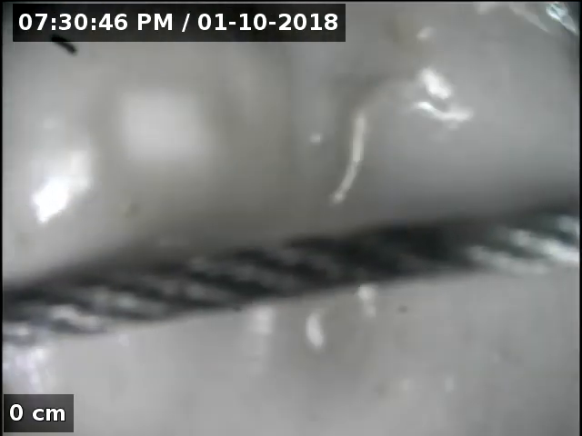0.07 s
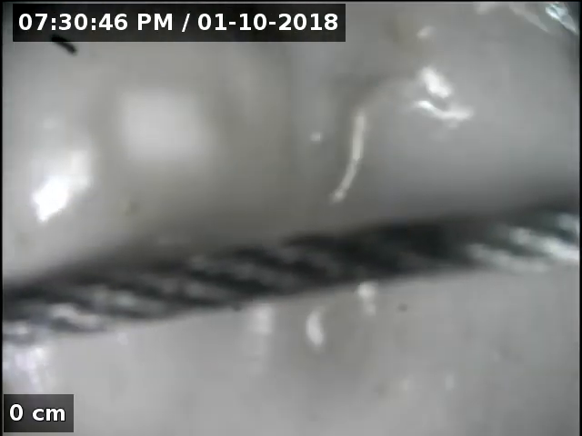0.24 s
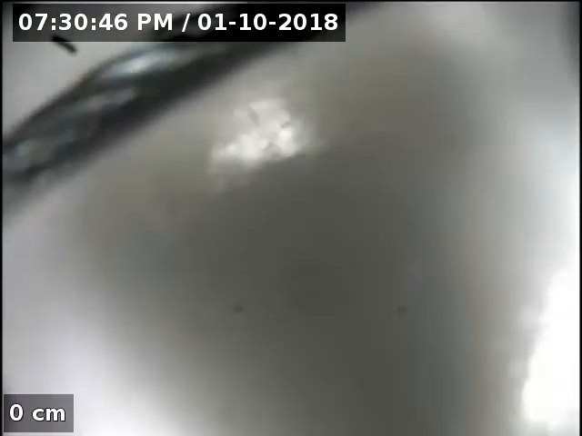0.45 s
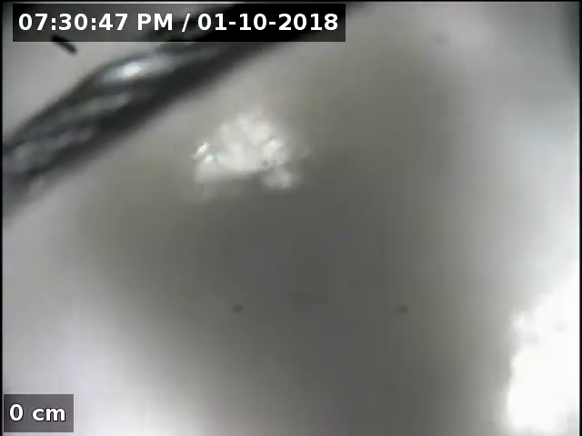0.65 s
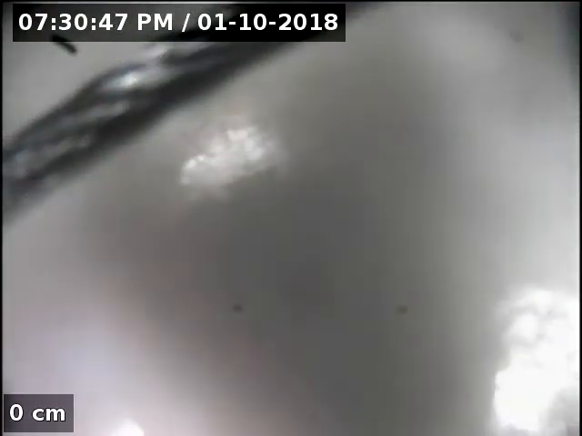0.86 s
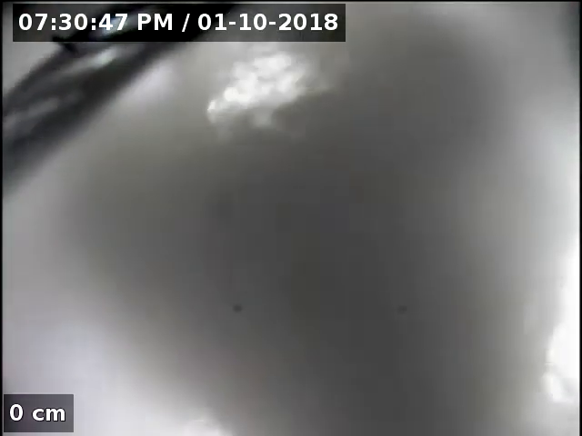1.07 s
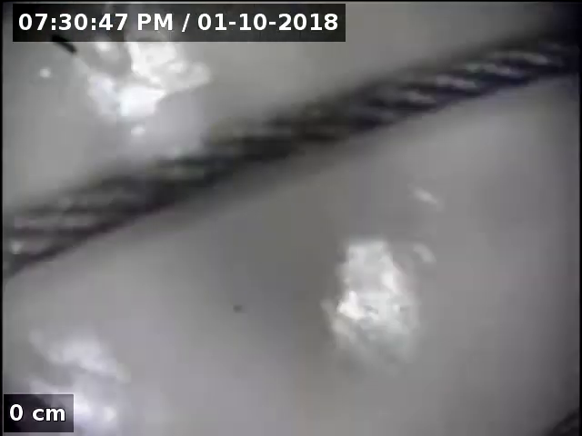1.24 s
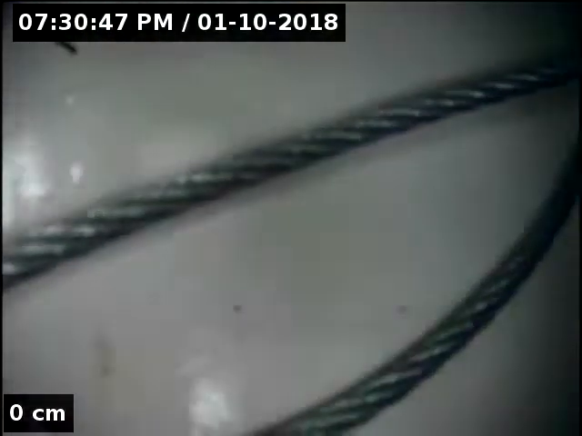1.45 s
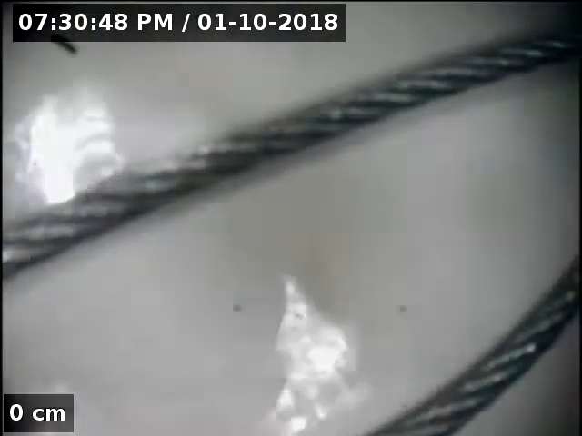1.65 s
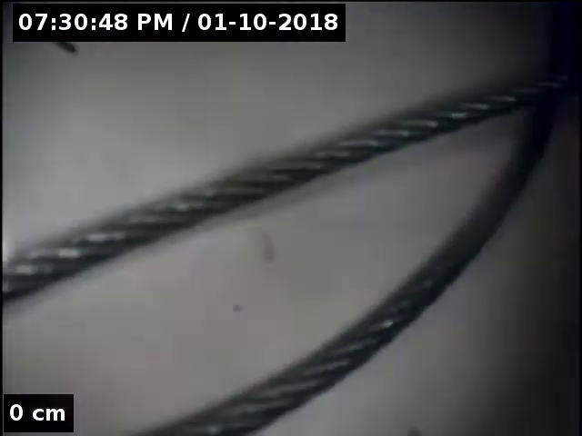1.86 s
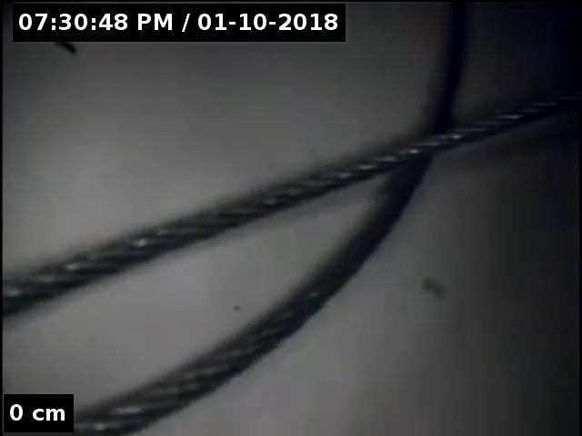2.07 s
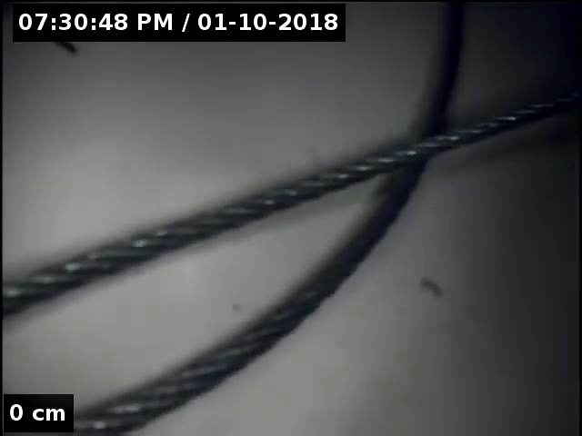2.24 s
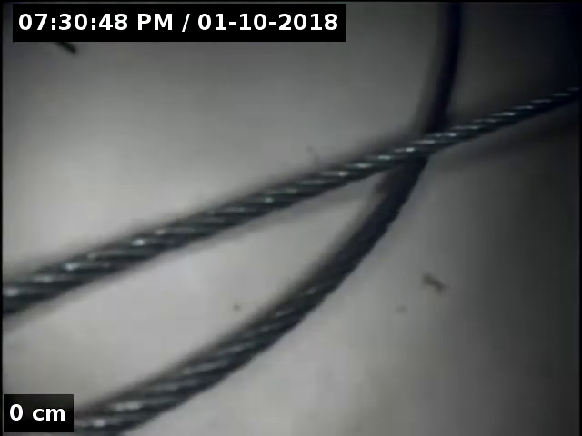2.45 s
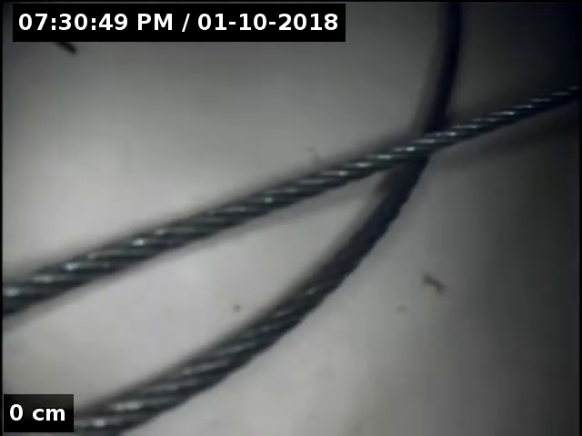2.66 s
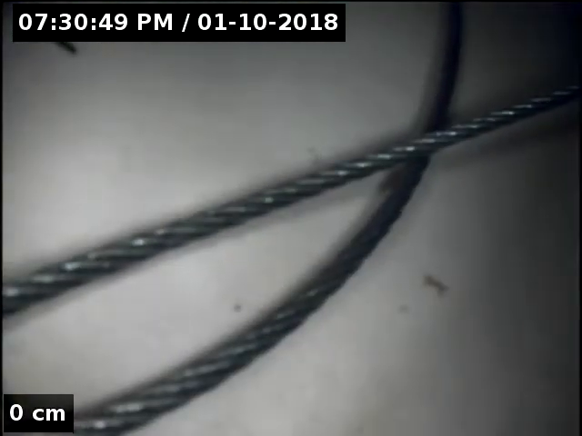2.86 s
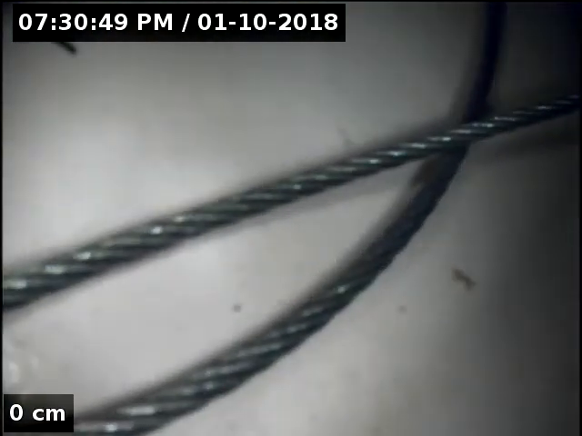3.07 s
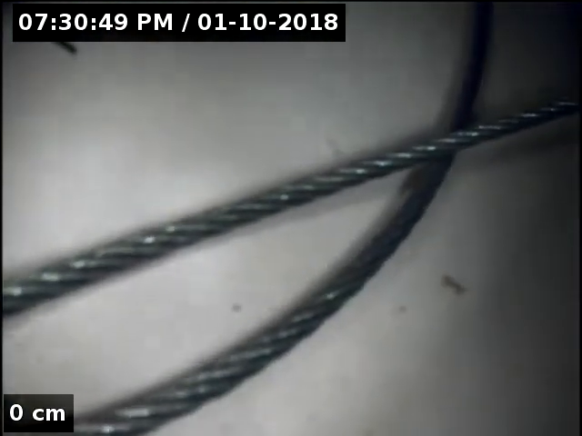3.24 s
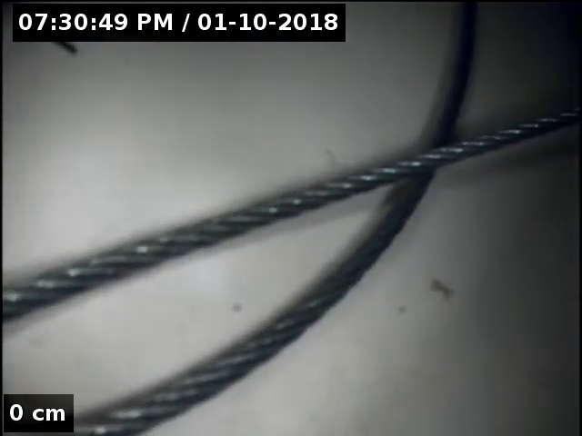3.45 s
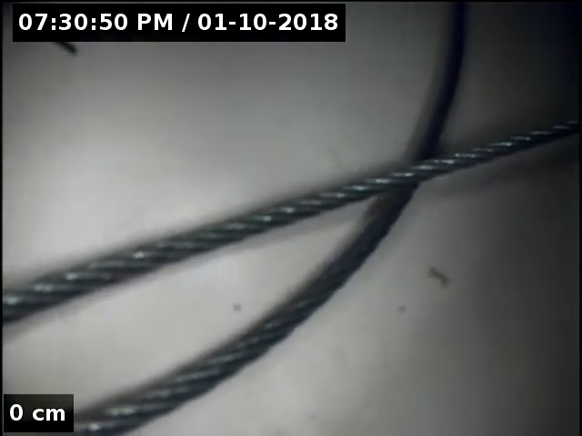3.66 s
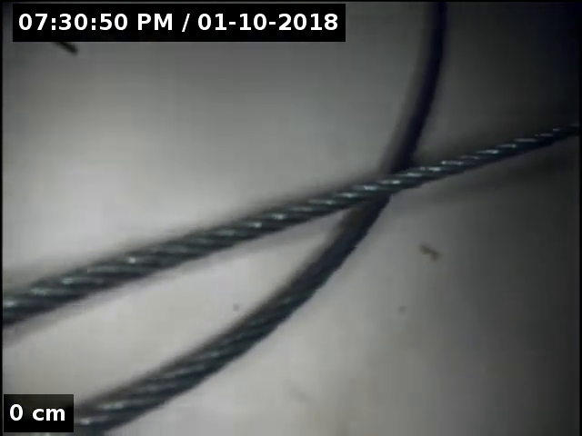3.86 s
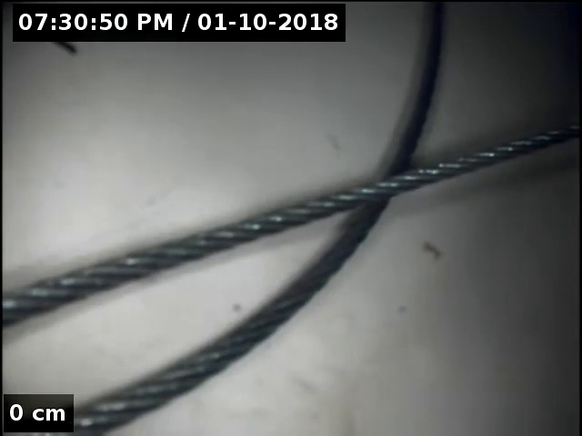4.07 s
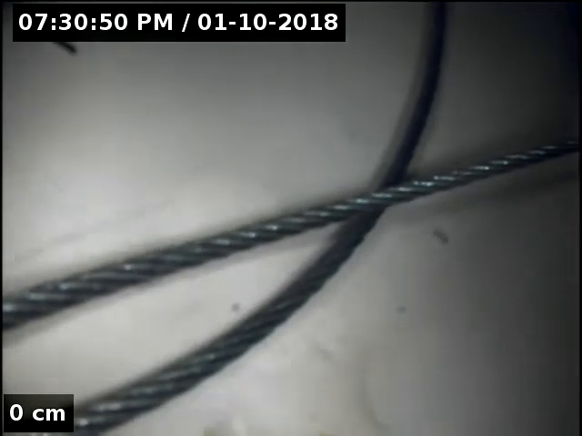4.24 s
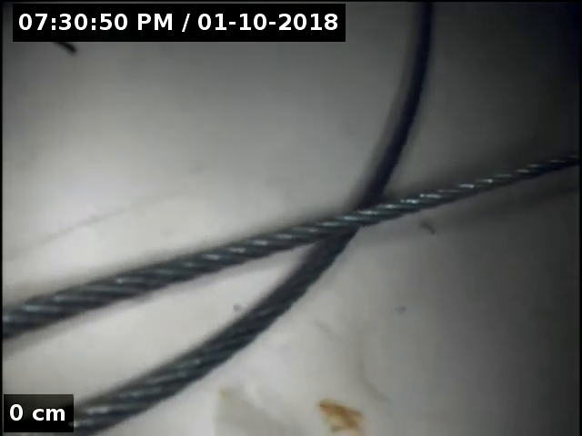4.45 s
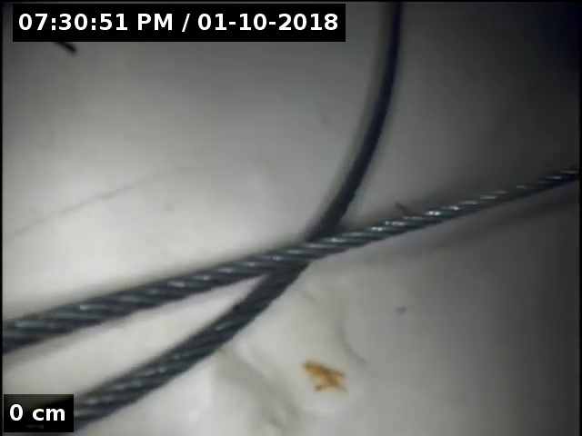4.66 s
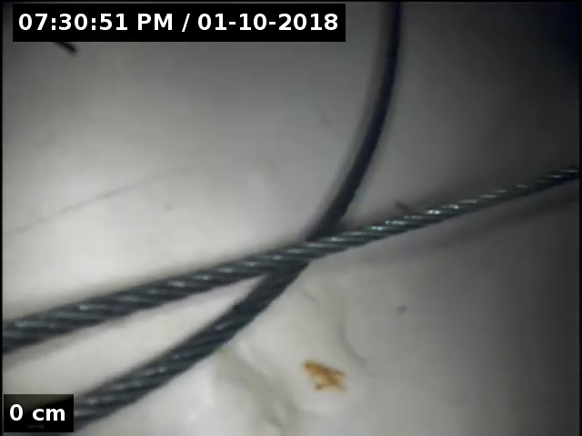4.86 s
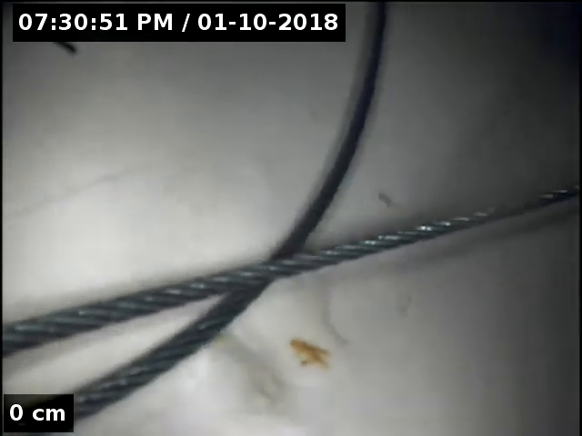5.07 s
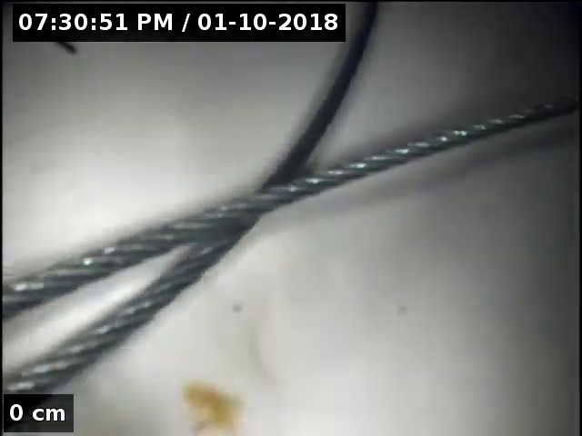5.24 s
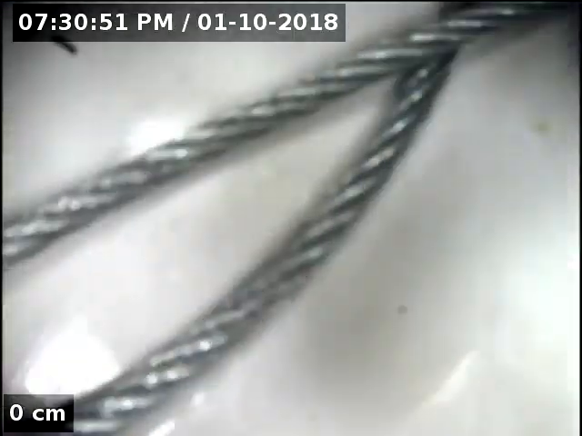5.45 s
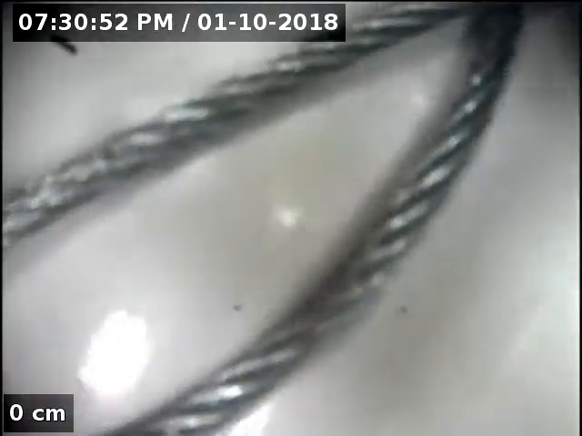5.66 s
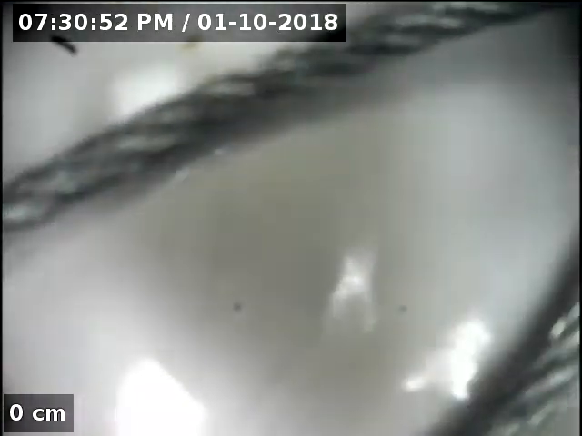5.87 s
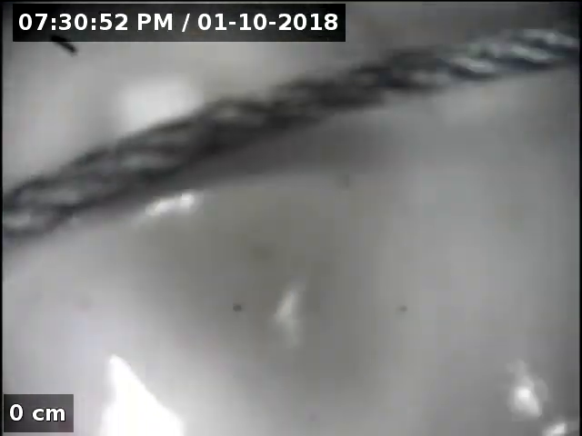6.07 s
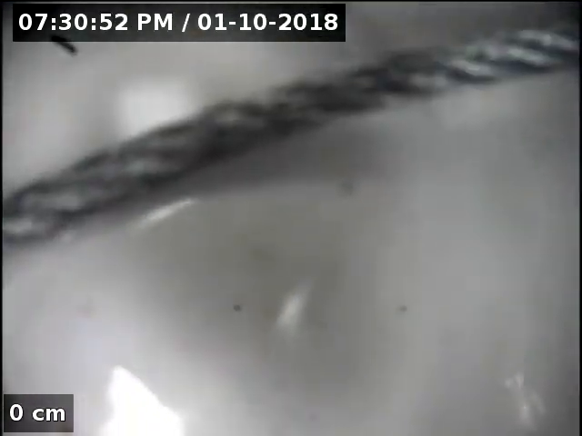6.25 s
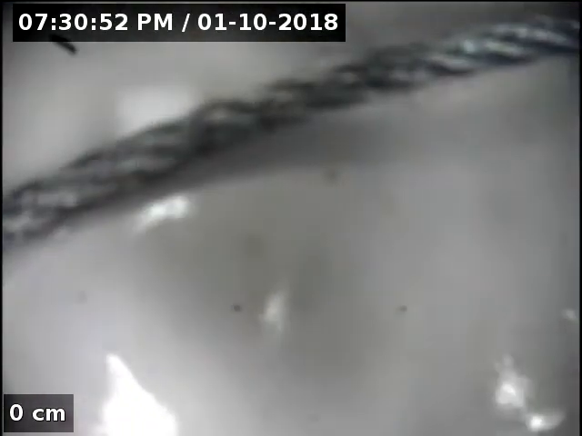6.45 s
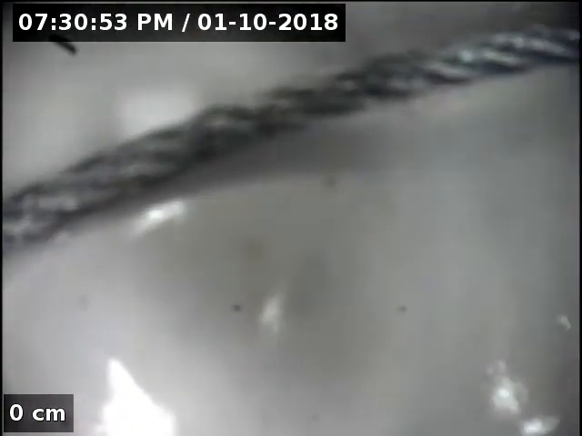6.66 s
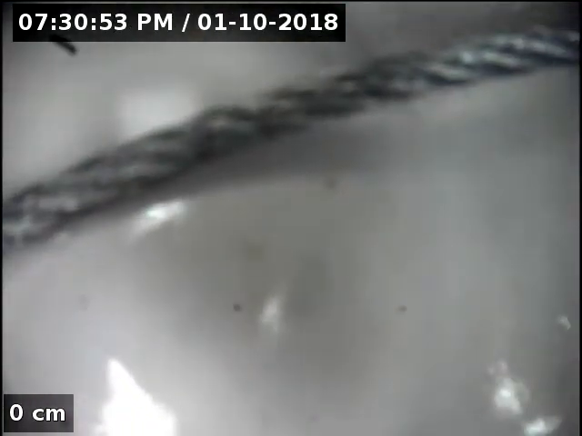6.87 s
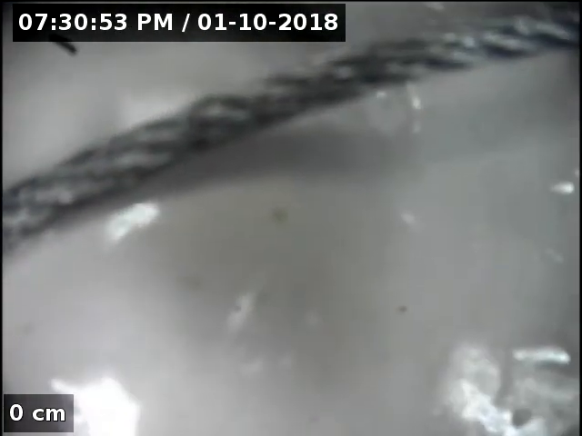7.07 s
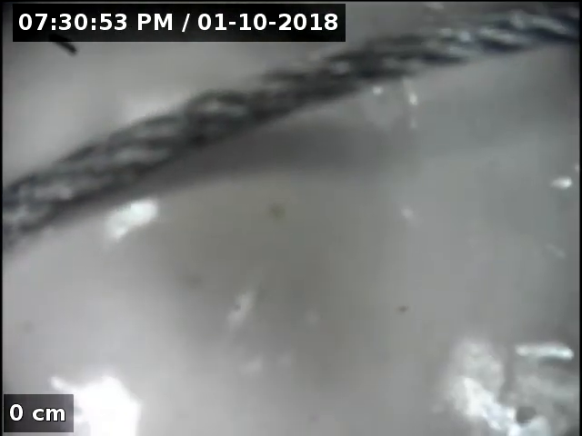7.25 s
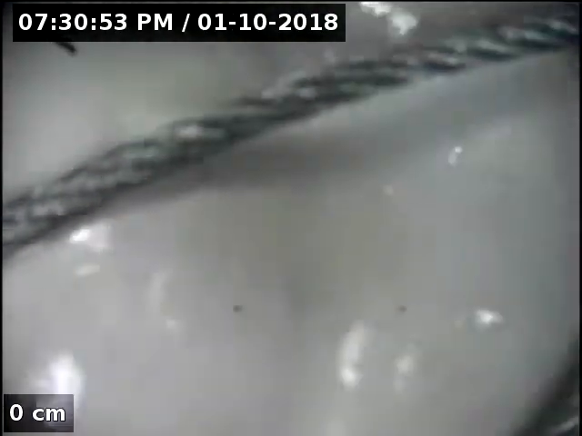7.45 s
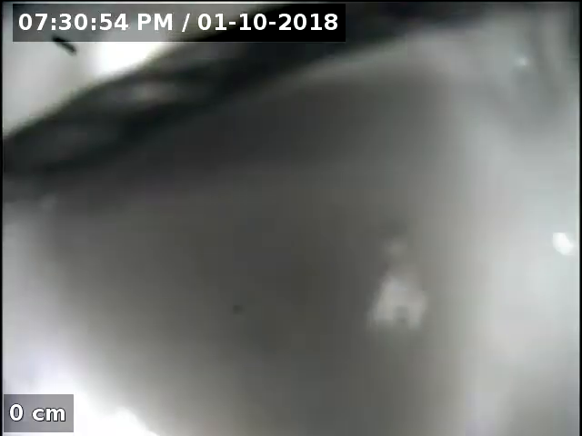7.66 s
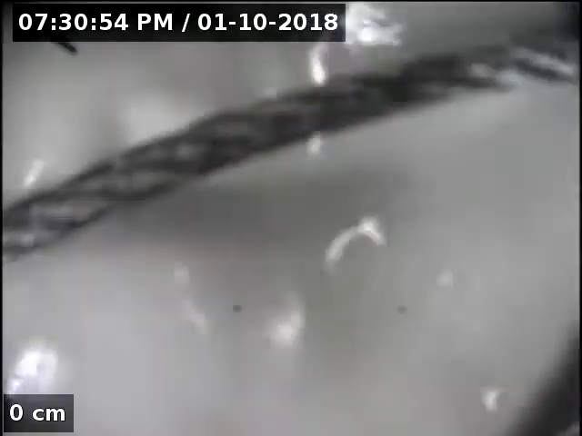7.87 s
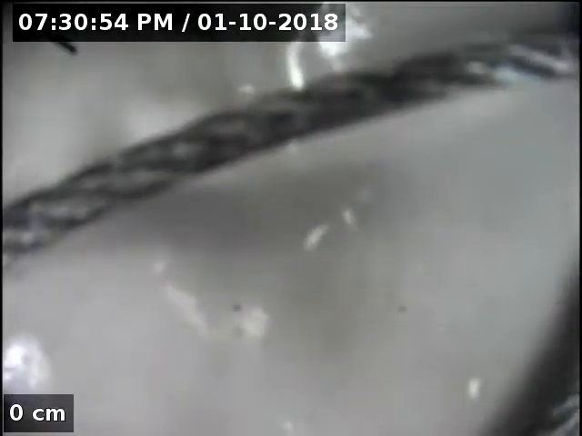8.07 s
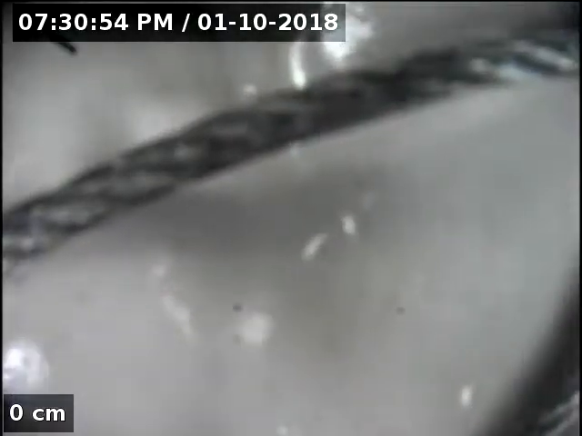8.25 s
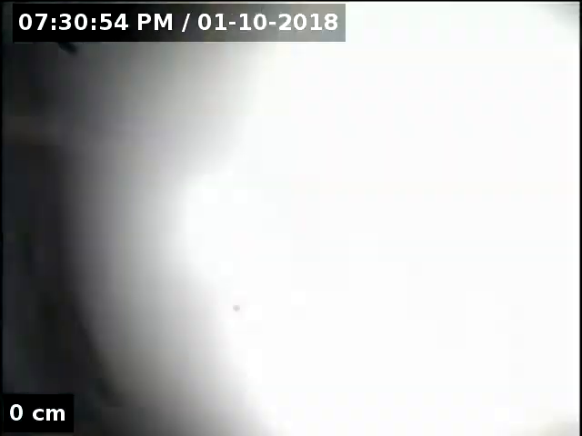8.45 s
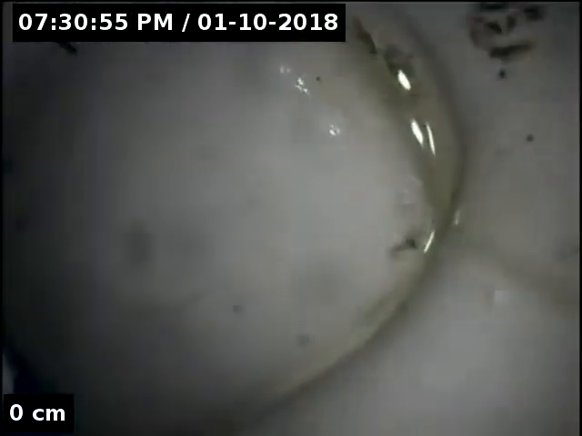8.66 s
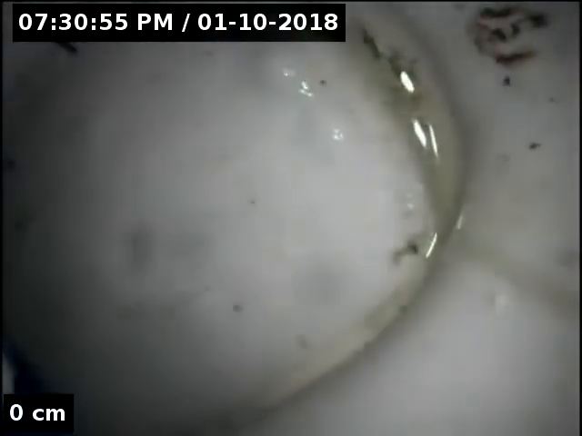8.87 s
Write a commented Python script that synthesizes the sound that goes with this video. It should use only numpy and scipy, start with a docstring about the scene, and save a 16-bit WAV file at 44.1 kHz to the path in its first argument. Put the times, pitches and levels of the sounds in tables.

```python
"""Steel cable in a porcelain bowl

A steel cable with a small metal head is worked back and forth inside a porcelain bowl. It ticks, knocks
and chatters: bursts of force ring the bowl's modes, and a small hard room answers with a decaying tail.
Random catch-and-slip pulses make the sliding, shaped noise the steady hiss, and a faint hum swells twice.
The narrow-band microphone thumps on loud knocks and cuts out once."""
import sys
import numpy as np
from scipy import signal
from scipy.fft import rfft, irfft
from scipy.io import wavfile
from scipy.ndimage import uniform_filter1d

SR = 44100
rng = np.random.default_rng(int(sys.argv[2]) if len(sys.argv) > 2 else 0)


def master_out(mix):
    """Clip the mix to full scale and print it as 16-bit PCM to the path in sys.argv[1]."""
    frames = np.transpose(np.atleast_2d(mix))
    ceiling = np.clip(frames, -1, 1)
    pcm = np.round(ceiling * 32767).astype(np.int16)
    wavfile.write(sys.argv[1], SR, pcm)


N = 392931
TIME = np.arange(N) / SR

# The cable or its head meets the porcelain. Each row: start in seconds, level in dB before the register
# levels, hardness in octaves above a dull thud, tick in dB relative to the level,
# chatter decay time in seconds (the bounces cap it).
CONTACTS = [(0.002, -19.5, 1.24, -20.5, 0.0027), (0.03, -30.5, 1.12, -29, 0.021),
            (0.069, -38.0, 1.16, -36, 0.0079), (0.157, -37, 0.86, -47, 0.012),
            (0.231, -47.5, 2.5, -20, 0.0052), (0.451, -41, 1.7, -29, 0.038),
            (0.502, -44, 2.8, -14.5, 0.0052), (0.571, -31, 1.14, -53, 0.0017),
            (0.608, -36.5, 1.36, -44, 0.0027), (0.702, -44, 3.06, -20, 0.001),
            (0.925, -35, 2.54, -17.5, 0.019), (1.084, -50, 2.96, -22, 0.0022),
            (1.196, -40.5, 1.74, -31, 0.025), (1.233, -52.5, 3.3, 0.5, 0.04),
            (1.293, -22, 3.92, -14, 0.0019), (1.548, -45.5, 2.37, -27, 0.0087),
            (1.616, -37, 2.48, -25.5, 0.01), (1.749, -43, 2.9, -20, 0.0015), (1.8, -47, 1.9, -30, 0.0056),
            (1.891, -43.5, 2.2, -30, 0.0014), (1.967, -37.5, 2.96, -24, 0.003),
            (2.238, -43.5, 0.25, -37, 0.016), (2.273, -41.5, 0.9, -44, 0.023),
            (2.385, -47.5, 0.69, -31, 0.011), (2.493, -48, 0.2, -32, 0.03),
            (2.533, -51.5, 2.86, -25, 0.0035), (2.637, -52.5, 2.65, -35, 0.0032),
            (3.06, -48.5, 2.8, -38, 0.002), (3.602, -58.5, 2.55, -6.5, 0.0015),
            (3.707, -48.5, 2, -37, 0.0022), (3.865, -54, 2.85, -27, 0.003), (4.388, -55.5, 2.6, -22, 0.003),
            (4.541, -49.5, 2.6, -10.5, 0.0024), (4.892, -52, 0.12, -38.5, 0.0025),
            (5.017, -55, 3.2, 2, 0.0028), (5.094, -46, 2.5, -31, 0.011), (5.112, -47.5, 3.3, -13, 0.011),
            (5.191, -38.5, 2.3, -22.5, 0.007), (5.364, -40, 2.06, -10, 0.0016),
            (5.396, -26.5, 2.62, -16, 0.0016), (5.415, -28.0, 2.53, -14, 0.016),
            (5.435, -32.5, 2.9, -14, 0.017), (5.475, -36, 2.7, -1, 0.0091), (5.513, -28, 1.1, -33, 0.014),
            (5.611, -47.5, 1.7, -37, 0.025), (5.675, -45.5, 0.9, -30, 0.041),
            (5.745, -41.5, 1.5, -39, 0.0089), (5.801, -44.5, 2.46, -19, 0.015),
            (5.82, -31.5, 1.29, -39, 0.0065), (5.912, -36, 0.97, -42, 0.0036),
            (5.959, -47.5, 3, -14, 0.003), (5.977, -46.5, 1.5, -33, 0.002), (6.031, -33.5, 2, -13, 0.0036),
            (6.045, -28.5, 2.2, -11.5, 0.027), (6.063, -25, 0.91, -17.5, 0.021),
            (6.081, -28, 2.03, -21, 0.0018), (6.115, -39, 2.3, -1.5, 0.011),
            (6.382, -41.5, 2.24, -24, 0.0015), (6.575, -40.0, 3.44, -18.5, 0.0048),
            (6.88, -42.0, 3.05, -25, 0.0022), (6.998, -34.5, 3.87, -22, 0.0017),
            (7.061, -42, 3.03, -21, 0.002), (7.344, -37.5, 2.96, -17.5, 0.006),
            (7.364, -42, 2.5, -7.5, 0.0035), (7.423, -34.5, 4, -18, 0.0016), (7.476, -36, 2.7, -23, 0.0075),
            (7.485, -27, 3.1, -15, 0.0013), (7.562, -34, 2.03, -20, 0.022), (7.589, -23, 2.98, -8, 0.0057),
            (7.812, -37, 1.68, -25, 0.027), (7.83, -34.5, 0.82, -27, 0.019),
            (7.849, -42.5, 2.44, -6.5, 0.017), (7.889, -34.5, 4, -17, 0.002),
            (7.947, -38, 2.1, -22, 0.0046), (7.959, -28.5, 3.9, -13.5, 0.004),
            (8.169, -39.5, 2.73, -18.5, 0.019), (8.206, -42, 2.95, -7, 0.0037),
            (8.321, -29.5, 3.8, -22, 0.002), (8.328, -22.5, 3.68, -13.5, 0.00091),
            (8.353, -25.5, 3.1, -10.5, 0.0048), (8.383, -23.5, 3.08, -14.5, 0.0079),
            (8.421, -21, 2.6, -16.5, 0.014), (8.475, -33.5, 6, -10.5, 0.014),
            (8.492, -34.5, 2.94, -5, 0.034), (8.513, -27, 3.53, -11.5, 0.02),
            (8.534, -15.5, 2.7, -6, 0.012), (8.566, -27, 4.8, -16, 0.002),
            (8.578, -14.5, 2.48, -10, 0.0049), (8.605, -19, 2.86, -14.5, 0.0012),
            (8.627, -18.5, 2.93, -5.5, 0.012), (8.677, -27, 2.8, -12.5, 0.0044)]
# Pitch ranges of a contact, from thud to tick. Each row: low edge in Hz, high edge in Hz, gain in dB.
REGISTERS = [(195.6, 676, 0.5), (765, 1293, 0), (1497, 2033, 2), (2240, 3145, 2), (4570, 7730, 0)]
ORDINARY_DB = -40   # level of an ordinary blow


def from_db(db):
    """Turn decibels into a gain."""
    return 10 ** (np.asarray(db) / 20)


def unit_energy(x):
    """Scale so that the squares sum to one."""
    return x / np.sqrt(np.sum(x ** 2) + 1e-20)


def filtered(x, hz, kind, order=2):
    """Butterworth filter that only looks back in time."""
    return signal.sosfilt(signal.butter(order, hz, kind, fs=SR, output="sos"), x)


def dying(t, t60):
    """Envelope that falls 60 dB in t60 seconds."""
    return np.exp(-np.log(1000) * t / t60)


def loudest(x, size=353):
    """Highest rms over any 8 ms."""
    mean_square = uniform_filter1d(x ** 2, size)
    return np.sqrt(mean_square.max() + 1e-20)


def coloured(x, spectrum):
    """The signal shaped by a spectrum, at rms 1."""
    hz, db = np.transpose(spectrum)
    bins = np.maximum(np.fft.rfftfreq(N, 1 / SR), 1)
    gain = from_db(np.interp(np.log(bins), np.log(hz), db))
    return np.sqrt(N) * unit_energy(irfft(rfft(x) * gain, N))


def contact_force(t, chatter_s, bounces_per_s=1500, bounce=0.34, clean_s=0.0038):
    """A first touch, then the strands skip over the glaze in bounces that die away."""
    longest_chatter_s = 0.035
    skips = (rng.random(len(t)) < bounces_per_s / SR) * rng.standard_normal(len(t))
    looseness = chatter_s ** 2 / (chatter_s ** 2 + clean_s ** 2)   # a short clean blow hardly bounces
    fading = np.exp(-t / np.clip(chatter_s, 1e-4, longest_chatter_s))
    force = bounce * looseness * skips * fading
    force[0] = 1
    return force


def mode_rings(t):
    """The bowl and the metal head vibrate in modes: one dying sine for each, as rows."""
    # Each row: frequency in Hz, relative level in dB, 60 dB decay time in seconds before cable damping.
    modes = [(168, -6, .15), (245, -11, .15), (355, -6, .15), (395, -9, .13), (560, -6, .13),
             (650, -9, .12), (785, -7, .14), (828, -8, .15), (968, -9, .12), (1097, -7, .14),
             (1214, -3, .15), (1303, -3, .11), (1465, -2, .12), (1512, -5, .12), (1578, -6, .13),
             (1788, 8, .17), (1850, -4, .12), (2006, -3, .12), (2207, -2, .11), (2405, 2, .095),
             (2636, 3, .095), (2788, -2, .1), (2890, -6, .09), (3130, -5, .08), (3510, 0, .05)]
    hz, db, t60 = np.transpose(modes)[:, :, None]
    return from_db(db) * dying(t, t60) * np.sin(2 * np.pi * hz * t)


def bowl_response(t, rings, damping_s, crack_db, spot_db=5.5, crack_t60=0.078, crack_hz=2800):
    """Each spot excites the modes differently; reflections inside the bowl add a short dense crack."""
    signs = rng.choice([-1, 1], len(rings))
    strength = from_db(spot_db * rng.standard_normal(len(rings))) * signs
    burst = rng.standard_normal(len(t)) * dying(t, crack_t60)
    crack = filtered(burst, crack_hz, "low", order=1)
    response = unit_energy(strength @ rings) + from_db(crack_db) * unit_energy(crack)
    # the cable lying against the glaze shortens the ring
    return response * dying(t, damping_s)


def register_levels(hardness, spring, tick_db):
    """A hump of dB that climbs with hardness and thins to a ping, with the tick of steel on top."""
    below_db_per_oct2, above_db_per_oct, ping_db_per_oct = 0.74, 11, 12
    low, high, gain_db = np.transpose(REGISTERS)
    centre = np.sqrt(low * high)[:-1]
    octaves = np.log2(centre / centre[0])
    above = octaves - min(hardness, octaves[-1])
    fall_below = spring * below_db_per_oct2 * above ** 2   # strong blows thud less
    hump_db = -np.where(above < 0, fall_below, above_db_per_oct * above)
    # the hardest touches are thin pings: the registers below the highest ringing one drop away,
    # leaving clink and tick
    hump_db[:-1] -= ping_db_per_oct * max(hardness - octaves[-1], 0)
    return np.append(hump_db, tick_db) + gain_db


def settling():
    """After some contacts the slack cable settles with a faint, soft thud, given as a contact row."""
    share, early_s, late_s = 0.3, 0.04, 0.1
    settle_db, follows = -54.5, 0.82   # level after an ordinary blow, dB per dB of the blow
    hardness, tick_db, chatter_s = 0.86, -33, 0.038
    draws = rng.random((len(CONTACTS), 2))
    thuds = []
    for (s, level_db, *_), (chance, wait) in zip(CONTACTS, draws):
        if chance < share:
            start_s = s + early_s + (late_s - early_s) * wait
            thud_db = settle_db + follows * (level_db - ORDINARY_DB)
            thuds.append((start_s, thud_db, hardness, tick_db, chatter_s))
    return thuds


def knocks():
    """Soft cable blows favour the low registers of the bowl, hard metal ones the high."""
    damping_t60_s, spring_doubles_db = 0.26, 20
    cling_s = 0.023   # a chattering cable clings: at this chatter time the damping time is halved
    crack_top_db, purity_db_per_oct = 3, 1.34   # harder contacts crack less against the modes
    t = np.arange(SR // 4) / SR
    out, rings = np.zeros(N + SR), mode_rings(t)
    bank = [signal.butter(3, (low, high), "band", fs=SR, output="sos") for low, high, _ in REGISTERS]
    for s, level_db, hardness, tick_db, chatter_s in list(CONTACTS) + settling():
        # stronger blows spring clear of the glaze, so they ring longer
        spring = 2 ** ((level_db - ORDINARY_DB) / spring_doubles_db)
        damping_s = damping_t60_s * spring / (1 + chatter_s / cling_s)
        crack_db = crack_top_db - purity_db_per_oct * hardness
        bowl = bowl_response(t, rings, damping_s, crack_db)
        blow = signal.fftconvolve(contact_force(t, chatter_s), bowl)[:len(t)]
        start = max(round(s * SR), 0)
        for sos, register_db in zip(bank, register_levels(hardness, spring, tick_db)):
            part = signal.sosfilt(sos, blow)
            out[start:start + len(t)] += from_db(level_db + register_db) * part / loudest(part)
    return out[:N]


def room(x, wall_hz=3000, build_s=0.012):
    """A dull diffuse tail that builds up as the walls answer, then dies away."""
    room_t60_s, room_db = 0.19, -14.5
    t = np.arange(SR // 2) / SR
    build_up = 1 - np.exp(-t / build_s)
    tail = rng.standard_normal(len(t)) * dying(t, room_t60_s) * build_up
    reflections = signal.fftconvolve(x, unit_energy(tail))[:N]
    return from_db(room_db) * filtered(reflections, wall_hz, "low", order=1)


def cable_motion(count=2000):
    """The cable slides around every contact, more briskly for a strong one, and creeps in between."""
    slide_db, follows = -54.5, 0.3   # level at an ordinary blow, dB per dB of the blow
    stroke_s, lag_s, creep_db = 0.11, 0.0067, -66.5   # at stroke_s from its peak a stroke is halved
    s, level_db = np.transpose(CONTACTS)[:2, :, None]
    t = np.linspace(0, N / SR, count)
    peak = from_db(slide_db + follows * (level_db - ORDINARY_DB))
    strokes = peak / (1 + ((t - s - lag_s) / stroke_s) ** 2)
    return np.interp(TIME, t, np.hypot(strokes.max(axis=0), from_db(creep_db)))


def slide(slips_per_s=500, damping_s=0.036):
    """The twisted strands catch and slip on the glaze, and every slip stirs the damped bowl."""
    # Each row: frequency in Hz, relative gain in dB.
    slide_colour = [(100, -22.5), (220, 6.5), (500, -4.5), (1100, -7), (2000, -11.5), (2900, -18),
                    (3700, -25.5), (7000, -20.5)]
    t = np.arange(SR // 4) / SR
    slips = rng.choice([-1, 1], N) * (rng.random(N) < slips_per_s / SR)
    bowl = bowl_response(t, mode_rings(t), damping_s, crack_db=9.5)
    rub = signal.fftconvolve(slips, bowl)[:N]
    return cable_motion() * coloured(rub, slide_colour)


def hiss(level_db=-56):
    """Steady background: random noise shaped by a fixed spectrum."""
    # Each row: frequency in Hz, relative level in dB per Hz.
    hiss_colour = [(15, -48), (25, -13.5), (128, 0.5), (219, -5), (301, -10.5), (340, -9.5), (434, -5.5),
                   (467, -20), (502, -5.5), (880, -2.5), (1430, -11.5), (1970, -14), (3890, -35),
                   (6660, -23.5), (8500, -40.5), (11000, -85), (18700, -120)]
    return from_db(level_db) * coloured(rng.standard_normal(N), hiss_colour)


def hum(hum_hz=143.8, width_hz=8):
    """Noise through a narrow resonance: a low, unsteady tone that rises, holds and fades."""
    # Each row: start of the hold in seconds, length of the hold in seconds, level in dB.
    swells = [(4.315, 0.15, -59), (6.9, 0.96, -61.5)]
    rise_db_per_s, fade_db_per_s = 86, 29
    resonance = signal.iirpeak(hum_hz, hum_hz / width_hz, fs=SR)
    tone = signal.lfilter(*resonance, rng.standard_normal(N))
    level = np.zeros(N)
    for s, length, db in swells:
        rise_db = rise_db_per_s * np.maximum(s - TIME, 0)
        fade_db = fade_db_per_s * np.maximum(TIME - s - length, 0)
        level += from_db(db - rise_db - fade_db)
    return level * np.sqrt(N) * unit_energy(filtered(tone, 300, "low"))


def scene():
    """Knocks with their room tail, over the sliding cable, the hiss and the hum."""
    hits = knocks()
    return (hits + room(hits) + slide() + hiss() + hum())[None]


def record(dry, lopsided=5.1, knee=0.29, bright_hz=2000, thump_hz=600, coupling_hz=24, null_width_hz=900):
    """Bright peaks overload the microphone on one side, which thumps; it has a treble null and cuts out once."""
    overload, null_hz, cutoff_hz = 0.72, 4000, 9600   # cutoff: 60 dB down from here up
    dropout_start_s, dropout_end_s = 4.729, 4.839
    bright = filtered(dry, bright_hz, "high")
    rectified = lopsided * bright ** 2 / (1 + (bright / knee) ** 2)
    thump = filtered(filtered(rectified, thump_hz, "low", order=1), coupling_hz, "high")
    x = dry + thump
    x = x / (1 + (x / overload) ** 4) ** 0.25   # soft limit on both sides
    x = signal.lfilter(*signal.iirnotch(null_hz, null_hz / null_width_hz, fs=SR), x)
    x = x * ((TIME < dropout_start_s) | (TIME > dropout_end_s))
    return signal.sosfilt(signal.cheby2(10, 60, cutoff_hz, fs=SR, output="sos"), x)


dry = scene()
out = record(dry)
master_out(out)
```